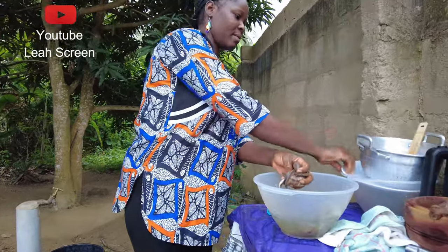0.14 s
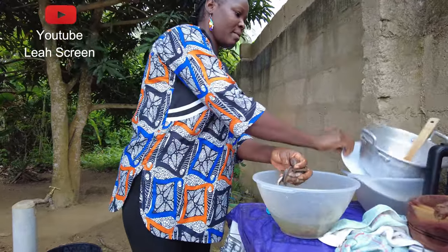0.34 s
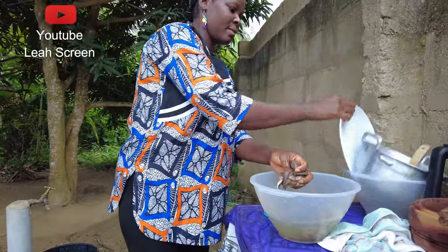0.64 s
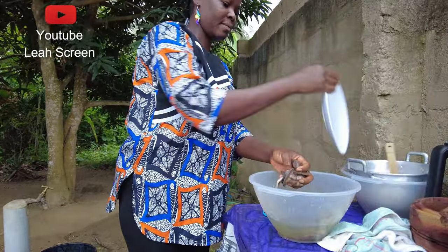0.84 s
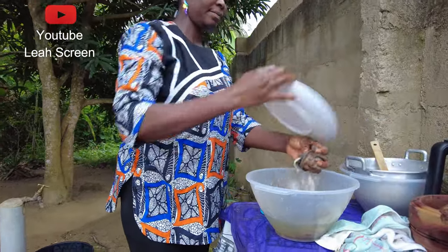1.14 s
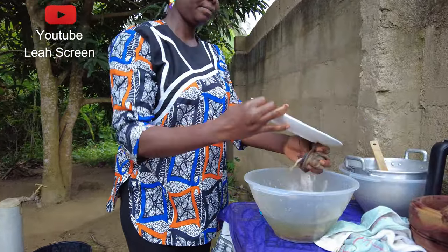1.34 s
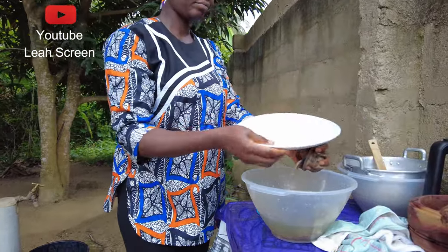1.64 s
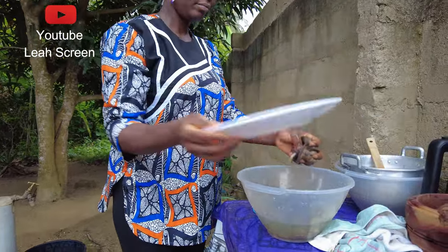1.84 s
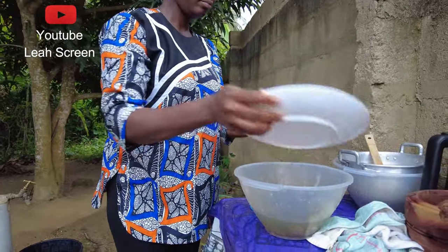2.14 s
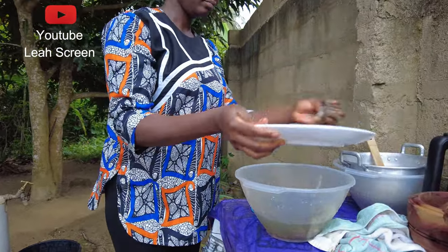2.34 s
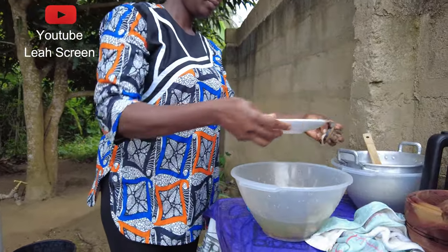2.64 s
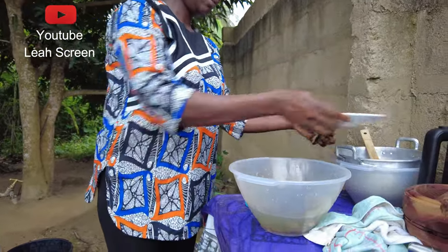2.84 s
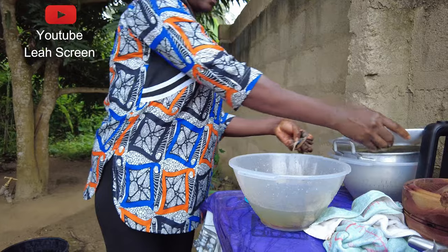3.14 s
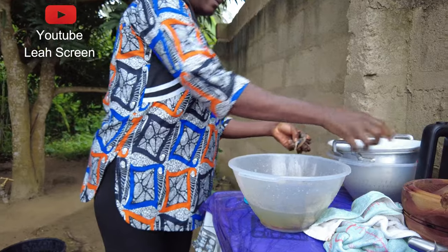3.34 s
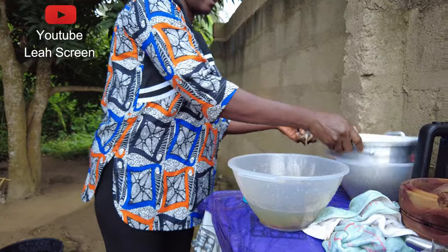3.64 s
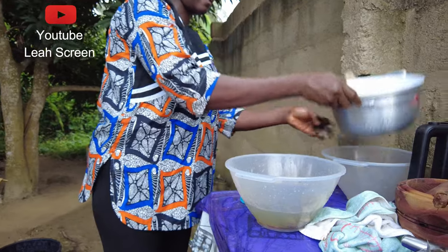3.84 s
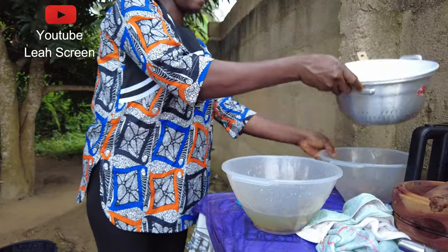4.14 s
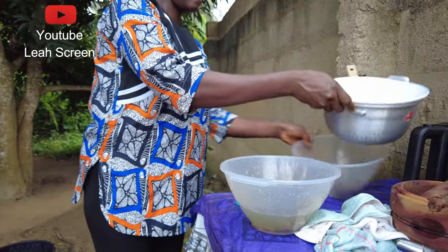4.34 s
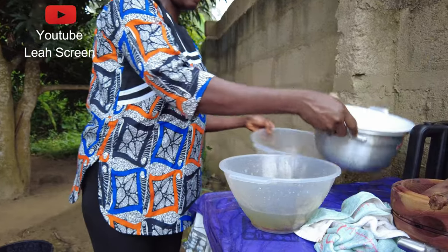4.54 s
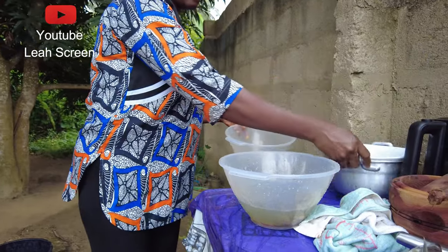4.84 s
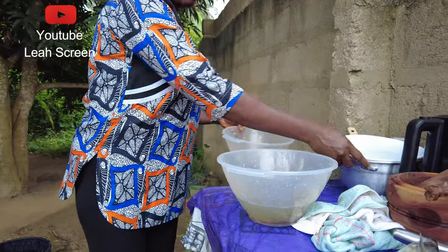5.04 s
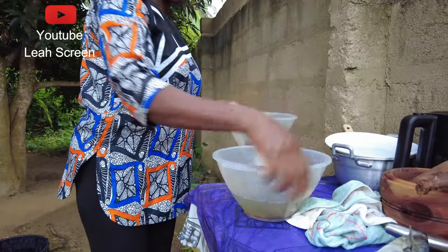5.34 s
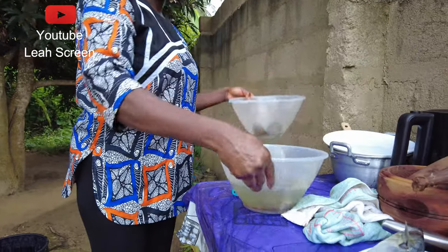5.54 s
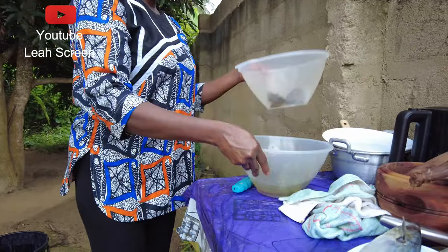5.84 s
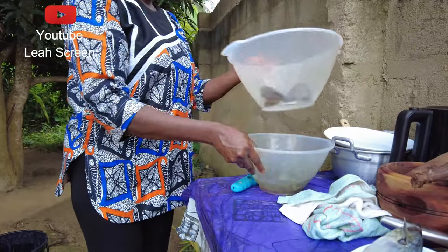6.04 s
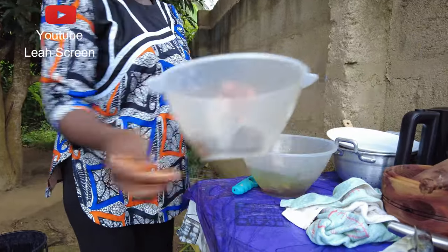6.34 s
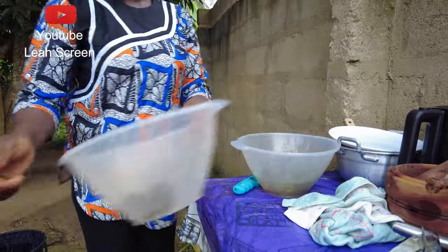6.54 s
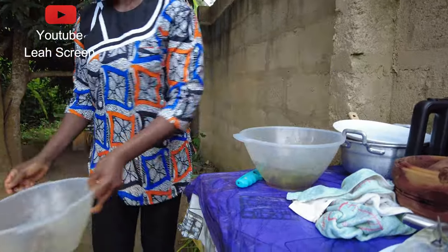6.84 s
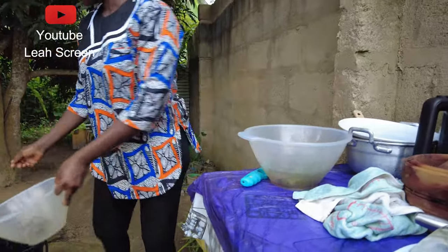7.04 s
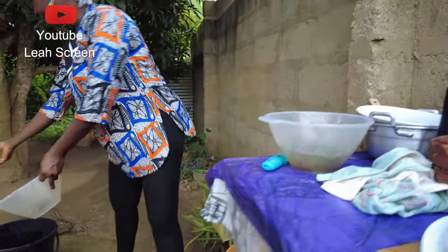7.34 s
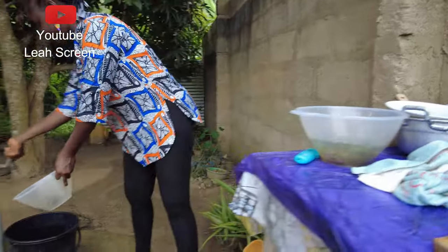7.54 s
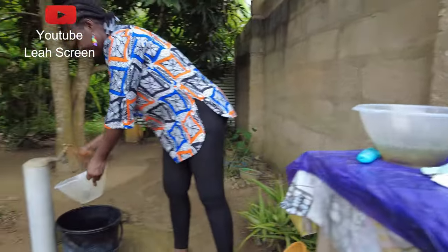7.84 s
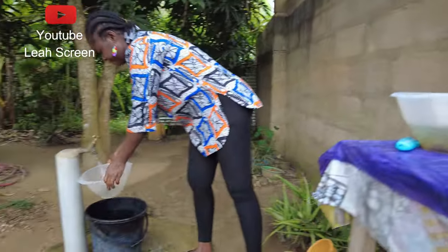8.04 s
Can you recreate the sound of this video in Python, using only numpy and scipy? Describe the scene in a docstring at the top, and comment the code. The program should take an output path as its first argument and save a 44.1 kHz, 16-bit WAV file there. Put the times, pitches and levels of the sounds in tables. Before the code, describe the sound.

Close stereo sound of outdoor kitchen handling: a burst of dry metallic clanks, scraping and dull table thuds comes first, followed by a lull of fabric swishes. A plate is set down with crisp clacks, light plastic taps follow, the pot is put down softly, and plastic bowls knock and slide with shells inside. Fine wet ticks and swelling cloth rustle close it, over low rumble, airy hiss and thin insect chirr.

```python
"""A metal pot, a plate laid on it as a lid and snail shells in plastic bowls knock about in a yard
kitchen: struck bodies sum damped modes and a dense clack, and sliding excites them by random slips.
The covered table thuds as short low pushes; wet shells and drops tick as brief rising notes. Sleeves
and cloth, insects, a low distant rumble and outdoor hiss are shaped random spectra. The table sounds
differ in phase and level between the two channels, and wall and ground echoes follow them."""
import sys
import numpy as np
from scipy import signal
from scipy.fft import rfft, irfft, next_fast_len
from scipy.io import wavfile
from scipy.ndimage import uniform_filter1d

SR = 44100
rng = np.random.default_rng(int(sys.argv[2]) if len(sys.argv) > 2 else 0)


def int16_out(signal):
    """Quantize to a 16-bit WAV file."""
    q = np.round(np.clip(np.atleast_2d(signal).T, -1, 1) * 32767)
    wavfile.write(sys.argv[1], SR, q.astype(np.int16))


N = 361619  # samples

# All levels are set ahead of the soft ceiling; those of table sounds also ahead of the stereo width.
# Blows on each body: [t/s, low level/dB, middle level/dB, bright level/dB, favoured mode f/Hz]
POT_STRIKES = [(0.064, -47, -24.5, -33.5, 1820), (0.147, -27.5, -39, -57.5, 1270),
               (0.28, -39, -35, -46, 1240), (0.414, -21, -17.5, -22, 1780), (0.428, -7.5, -25, -28.5, 1630),
               (0.451, -4.5, -34.5, -24, 1590), (0.498, -7, -20, -29.5, 1260),
               (0.526, -26.5, -23.5, -36.5, 1600), (0.591, -9.5, -21.5, -34, 1250),
               (0.659, -4, -42.5, -37, 1580), (0.681, -7, -6.5, -6, 1826), (0.693, -9.5, -27, -21.5, 1270),
               (0.737, -9.5, -36, -31, 1440), (0.777, -8.5, -30.5, -16.5, 1000),
               (0.785, -9, -20, -6.5, 2010), (0.817, -10, -14.5, -10, 2670), (1.193, -40, -30, -34.5, 1207),
               (4.927, -25.5, -32, -39, 1280), (4.975, -21.5, -14, -26.5, 1524),
               (5.028, -38.5, -21, -25, 950), (5.046, -35, -13, -30, 1516),
               (5.064, -37.5, -18.5, -49, 1550), (5.086, -26, -25, -48, 1480)]
LID_STRIKES = [(2.748, -62.5, -32.5, -27, 3080), (3.044, -10.5, -8, -9.5, 1810),
               (3.116, -23.5, -36, -38, 2680), (3.154, -28.5, -15, -17, 2600),
               (3.256, -25, -20.5, -23, 1570), (3.292, -14.5, -5, -11, 1968), (3.336, -47, -29, -30, 1980),
               (3.489, -40.5, -41.5, -60.5, 1530), (3.557, -46, -45, -64, 1500),
               (3.762, -39.5, -53, -46, 1260)]
BOWL_STRIKES = [(1.534, -44.5, -35, -43.5, 2690), (1.907, -72, -52.5, -36, 1770),
                (3.986, -38, -42, -43.5, 1240), (4.065, -22.5, -21.5, -28.5, 1270),
                (4.195, -32, -29.5, -52.5, 1260), (4.215, -40, -30, -56, 1380),
                (4.253, -33.5, -31.5, -60, 1740), (4.435, -8.5, -12, -17.5, 1670),
                (5.203, -35.5, -34, -56, 1160), (5.447, -26, -26, -31.5, 1440),
                (5.655, -44, -28.5, -51.5, 1500), (5.713, -35, -39, -59.5, 1250),
                (5.825, -21, -16.5, -30, 1370), (5.842, -18, -21, -22.5, 1100),
                (5.916, -16, -18.5, -25.5, 1770), (5.944, -12.5, -11.5, -18.5, 1800),
                (5.977, -21.5, -27, -48.5, 1370), (6.241, -23, -50.5, -46, 1590),
                (6.446, -46, -34.5, -46, 3000), (6.509, -35.5, -28.5, -58.5, 1300),
                (6.579, -46, -39, -27.5, 2210), (6.64, -56, -29.5, -33, 1510),
                (6.666, -33.5, -36, -53, 1490), (6.756, -17.5, -42.5, -49, 1010),
                (6.775, -19.5, -16, -52.5, 1300), (6.799, -32.5, -16, -57, 1000),
                (6.846, -45, -23, -24, 2060), (7.137, -39, -50.5, -54, 1260),
                (7.276, -53, -39, -29.5, 2920), (7.369, -51.5, -39.5, -28.5, 1790),
                (7.487, -52, -51.5, -32.5, 2280)]
# Normal modes of each body: [f/Hz, level/dB, free t60/s]
POT_MODES = [(452.2, -13.5, 0.035), (544, 6.5, 0.068), (667, -11.5, 0.065), (839.5, -9.5, 0.04),
             (1279, -3.5, 0.07), (1550, 3, 0.082), (1683, 0.5, 0.0375), (1796, -10.5, 0.019),
             (2012, 2.5, 0.034), (2513, -14.5, 0.093), (2670, 4, 0.032), (2910, -0.5, 0.061),
             (3500, -15, 0.069), (4080, 2, 0.038), (4300, 4, 0.045), (5940, -12.5, 0.15),
             (6179, -7.5, 0.071), (7640, -7.5, 0.068)]
LID_MODES = [(453, 2, 0.15), (673, -8, 0.058), (1016, -7, 0.088), (1336, -4.5, 0.1), (1550, 7, 0.04),
             (1988, 11, 0.053), (2130, 4, 0.083), (2200, -14.5, 0.079), (2640, 4, 0.087), (2940, -1, 0.1),
             (2965, 5.5, 0.3), (3206, 8.5, 0.03), (3554, 16, 0.033), (3720, -3.5, 0.074), (4660, 3.5, 0.13),
             (4565, 11, 0.0907), (6070, -8, 0.07), (7800, 3.5, 0.056)]
BOWL_MODES = [(429.6, -6, 0.14), (537, 0, 0.0567), (586, 7, 0.017), (670, 3.5, 0.033), (1000, 14.5, 0.151),
              (1270, 8, 0.071), (1600, 8.5, 0.052), (1770, 4.5, 0.13), (2100, 4, 0.13), (2270, -15.5, 0.12),
              (2770, 3, 0.038), (3253, -27, 0.046), (4144, 13, 0.024), (5040, 4.5, 0.0186)]
# Sliding and rattling between blows:
# [peak t/s, body level/dB, rise from 20 dB down/s (sign ignored), fall by 20 dB/s, bright share/dB]
POT_STROKES = [(0.062, -45, -3, 1.2, -7.5), (0.264, -33, 0.1, 0.14, -18.5), (0.425, -25, 0.012, 0.13, -18),
               (0.53, -28.5, 0.3, 0.12, -18.5), (0.66, -20, 0.012, 0.13, -16.5),
               (0.72, -25, 0.2, 0.24, -10.5), (0.81, -26.5, -0.2, 0.16, -19), (0.9, -50, 0.05, 0.2, -22),
               (4.92, -39.5, -0.07, 0.07, -22), (4.98, -27, 0.04, 0.07, -15),
               (5.058, -25, 0.12, 0.07, -18.5)]
LID_STROKES = [(3.055, -27.5, 0.008, 0.115, -39), (3.235, -39, 0.062, 0.097, -15),
               (3.3, -20, 0.0304, 0.073, -13)]
BOWL_STROKES = [(4.076, -48, 0.082, 0.075, -18.5), (4.198, -39, 0.082, 0.094, -26),
                (4.445, -48, 0.008, 0.08, 6), (5.955, -24.5, 0.113, 0.0485, -21),
                (5.84, -42, 0.033, 0.155, 3.5), (6.43, -42.5, 0.0396, 0.54, -23),
                (6.6, -52, 0.13, 0.15, -19.5), (6.772, -20.5, 0.025, 0.071, -40),
                (7.14, -42.5, 0.28, 0.046, -22), (7.3, -60, 0.045, 0.18, -12),
                (7.46, -59.5, 0.15, 0.07, -4), (8.03, -53, 0.13, 0.17, -24)]
# Dull pushes through the table top and bowl bottoms: [t/s, peak level/dB, f/Hz]
TABLE_PUSHES = [(0.129, -27, 234), (0.306, -26, 288), (0.426, -18, 226.7), (0.455, -12.5, 279),
                (0.591, -20.5, 347), (0.657, -14, 267.3), (0.693, -14.5, 166.4), (0.783, -3.5, 226),
                (0.798, -11, 225.4), (0.821, -11.5, 269.5), (3.042, -23, 183), (3.115, -24, 199),
                (3.298, -9, 259.3), (3.333, -17.5, 240), (3.486, -31, 236.4), (3.687, -35.5, 218),
                (3.761, -32.5, 230), (4.066, -18.5, 163.2), (4.094, -20.5, 155), (4.127, -27, 155.8),
                (4.187, -28, 136.7), (4.907, -24, 161), (4.979, -18.5, 276.4), (5.037, -26, 227.7),
                (5.447, -29, 118), (5.873, -5.5, 162), (5.957, -13, 140.7), (5.984, -20, 180),
                (6.244, -27, 152), (6.757, -11, 278), (6.775, -11.5, 265), (6.799, -20.5, 318),
                (7.083, -31, 210)]
# Ticks of wet shells and drops: [t/s, level/dB, starting f/Hz]
SHELL_TICKS = [(5.7763, -39, 1550), (6.4741, -35.5, 3020), (6.548, -34, 1280), (6.5685, -35, 2200),
               (7.276, -39, 2885), (7.3044, -42, 2200), (7.3442, -42, 2100), (7.3731, -32.5, 1759),
               (7.3915, -42, 1740), (7.426, -36, 1653), (7.375, -37, 4600), (7.43, -39, 4600),
               (7.4494, -41, 2640), (7.4855, -41, 2270), (7.5058, -39, 3036), (8.145, -31, 4333)]
# Dense unresolved overtones of a knock: [f/Hz, level/dB per Hz]
CLACK_SPECTRUM = [(150, -3), (350, 3), (664, 4.5), (1060, 2), (1760, -5), (2710, -9.5), (3850, -11),
                  (6330, -18.5), (10000, -28), (16000, -30)]
# Edges between the low, middle and bright parts of a blow: [f/Hz]
BAND_EDGES = [900, 3500]

# Continuous cloth movement: [t/s, treble level/dB, extra level below the treble/dB]
CLOTH_MOVEMENT = [(0.0, -66.5, 10.5), (0.28, -60, 6.5), (0.95, -63, 6), (1.3, -62.5, 4.5), (2.0, -63, 4),
                  (2.3, -61.5, 7.5), (2.6, -61, 4), (2.73, -68, 4), (3.03, -69.5, 13.5), (3.49, -73, 10.5),
                  (3.8, -59, 1.5), (4.27, -63, 5), (4.5, -58, 0), (5.2, -59.5, 5), (5.76, -58, 2.5),
                  (6.0, -58, 2.5), (6.6, -59, 10.5), (7.0, -59, 3.5), (7.2, -59.5, -5), (7.3, -55.5, 5),
                  (7.5, -55.5, 2), (7.6, -58.5, -5), (8.2, -48, -2)]
# Single sleeve swishes: [peak t/s, treble level/dB, rise and fall by 20 dB/s]
SLEEVE_SWISHES = [(1.162, -56, 0.11), (1.37, -59, 0.085), (1.44, -55.5, .04), (1.594, -55, .05),
                  (2.054, -50, 0.045), (2.205, -46.5, 0.119), (2.338, -52.5, 0.046), (2.495, -52.5, .08),
                  (2.575, -52, 0.057), (2.867, -46, 0.124), (4.068, -53.5, 0.14), (4.169, -44.5, 0.047),
                  (4.353, -58.5, .08), (4.702, -55.5, 0.087), (5.228, -51, .03), (5.282, -52, 0.094),
                  (5.453, -49.5, .08), (5.65, -51.5, 0.15), (5.823, -58, 0.044), (6.033, -47.5, 0.095),
                  (6.213, -49, 0.098), (6.42, -52, .05), (6.557, -50.5, .05), (6.65, -52, 0.06),
                  (6.946, -49.5, 0.07), (7.121, -55, 0.092), (7.24, -55, 0.026), (7.749, -50.5, 0.11)]
# Spectrum of rubbed cloth: [f/Hz, level/dB per Hz]
CLOTH_SPECTRUM = [(500, -31.5), (900, -0.5), (1500, 8), (2400, 3.5), (3050, 8), (3800, 1.5), (4600, 3.5),
                  (6000, 1.5), (9300, 2.5), (11600, -1), (13000, 3), (16000, 0.5)]
# Air of the yard, in phase and in opposition in the channels: [f/Hz, level/dB per Hz]
AIR_COMMON = [(88, -50), (150, 3.5), (286, -6.5), (448, -4), (998, -19), (1260, -13), (1870, -20.5),
              (2980, -35), (5050, -32.5), (5790, -18), (7040, -35), (9260, -22), (10200, -37.5),
              (13200, -34), (16000, -47.5)]
AIR_OPPOSED = [(35, -17), (60, 15), (113, 1), (301, -6), (540, 0.5), (785, -2), (1140, -1.5), (1340, -20),
               (2840, -11.5), (5860, -2.5), (7060, -7.5), (9350, -9.5), (10500, -16), (13600, -14.5),
               (16000, -13)]
# Distant rumble: [f/Hz, level/dB per Hz]
RUMBLE_SPECTRUM = [(8.8, -1.5), (15, -16.5), (70, 1.5), (91, 2), (117, -11), (150, -19), (195, -17.5),
                   (225, -18), (260, -26.5), (340, -43), (570, -120)]
# Insect chirr, its higher band louder near the end:
# [centre f/Hz, width/Hz, relative level/dB, late level change/dB]
CHIRR_BANDS = [(5900, 450, 0, 0), (9100, 450, -1, 7)]

# Phase difference between the channels: [f/Hz, phase/rad (negative is a lag of the far channel)]
CHANNEL_PHASE = [(0, 0), (100, -.3), (250, -.8), (500, -1.75), (860, -2.3), (1030, -3.3), (1140, -3.6),
                 (1260, -6.7), (2600, -6.7), (4000, -8.8), (5000, -8.5), (6000, -6.6), (7000, -8.7),
                 (9000, -7.3), (16000, -8.4)]
# Level difference between the channels: [f/Hz, far minus near level/dB]
CHANNEL_LEVEL = [(2300, 0), (2930, 1.5), (3900, 0.5), (5200, -6), (6500, -2), (9000, -4), (12000, 0)]
# Decay of wall and ground echoes: [f/Hz, t60/s]
YARD_DECAY = [(200, 0.32), (1000, 0.178), (4000, 0.1835), (12000, 0.2)]

AIR_COMMON_DB, AIR_OPPOSED_DB, RUMBLE_DB, INSECTS_DB = -53.5, -54.5, -41, -63.5  # RMS
SWISH_LOWER_DB = -1.5  # a swish is thinner below the treble
ECHO_DB = -9.5
THUD_T60_S, THUD_T60_S_PER_DB = 0.017, 0.001  # the hardest pushes are pressed down and die soonest
CROSS_S = 6.2  # the bowl is carried from right to left: near and far channel change places
LATE_S = 7.25  # the higher insect band grows louder from here
EDGE_HZ = 15740  # upper band limit


def amp(db):
    """A level in decibels is twenty times the logarithm of the amplitude ratio."""
    return 10 ** (np.asarray(db) / 20)


def evened(x):
    """Dividing by the root mean square brings a signal to unit effective value."""
    return x / np.sqrt(np.mean(x ** 2) + 1e-20)


def read(points, hz):
    """A spectrum is interpolated along logarithmic frequency."""
    f, value = np.transpose(points)
    return np.interp(np.log(hz + 1), np.log(f + 1), value)


def add(mix, s, sound):
    """Superposition: a sound is summed into the mix from time s."""
    part = mix[max(round(s * SR), 0):][:len(sound)]
    part += sound[:len(part)]


def noise(shape_db, patchy_db, size):
    """Gaussian short-time spectra follow the level shape_db(hz, t), roughened by drifting patches."""
    frames = 4 * N // size + 5
    hz = np.fft.rfftfreq(size, 1 / SR)[:, None]
    t = np.arange(frames) * size / 4 / SR
    real, imaginary, patches = rng.standard_normal((frames, len(hz), 3)).T
    patches = uniform_filter1d(patches, size=8, axis=0)  # across frequency
    patches = evened(uniform_filter1d(patches, size=10, axis=1))  # across time
    spectra = (real + 1j * imaginary) * amp(shape_db(hz, t) + patchy_db * patches)
    return signal.istft(spectra, nperseg=size, noverlap=3 * size // 4)[1][:N]


def yard_air():
    """Coherence: lumpy rumble is alike in both channels; faint hiss has common and opposed parts."""
    rumble = evened(noise(lambda hz, t: read(RUMBLE_SPECTRUM, hz), 1.22, size=2048))
    hiss = evened(noise(lambda hz, t: read(AIR_COMMON, hz), 4.6, size=1024))
    common = amp(AIR_COMMON_DB) * hiss + amp(RUMBLE_DB) * rumble
    opposed = evened(noise(lambda hz, t: read(AIR_OPPOSED, hz), 1.7, size=1024))
    opposed *= amp(AIR_OPPOSED_DB)
    return np.array([common + opposed, common - opposed])


def insects():
    """Narrow-band noise: resonance-shaped bands of hiss, incoherent between the channels."""
    centre_hz, width_hz, db, late_db = np.transpose(CHIRR_BANDS)[:, :, None, None]

    def shape_db(hz, t):
        late = np.clip((t - LATE_S) / 0.15, 0, 1)
        level = amp(db + late_db * late)
        resonance = 1 / (1 + (2 * (hz - centre_hz) / width_hz) ** 2)
        return 20 * np.log10((level / np.sqrt(width_hz) * resonance).sum(0))

    return amp(INSECTS_DB) * np.array([evened(noise(shape_db, 1.8, size=1024)) for _ in "LR"])


def rustle(alike, apart):
    """Friction noise: cloth hiss swells with movement and swishes, partly alike in the channels."""
    s, bed_db, lower_db = np.transpose(CLOTH_MOVEMENT)
    at, peak_db, length = np.transpose(SLEEVE_SWISHES)[:, :, None]

    def shape_db(hz, t):
        below = np.clip(np.log2(10000 / (hz + 50)), 0, 1)  # 0 in the treble, 1 from an octave below
        swish = (amp(peak_db - 20 * abs(t - at) / length) ** 2).sum(0)
        swish = swish * amp(SWISH_LOWER_DB * below) ** 2
        bed = amp(np.interp(t, s, bed_db) + np.interp(t, s, lower_db) * below) ** 2
        return read(CLOTH_SPECTRUM, hz) + 10 * np.log10(bed + swish)  # powers add

    # takes the loudness of the cloth spectrum itself out of the levels
    cloth = amp(read(CLOTH_SPECTRUM, np.fft.rfftfreq(256, 1 / SR)))
    steady = np.linalg.norm(cloth) * np.sqrt(2 / 3)
    shared, left, right = (noise(shape_db, 2.2, size=256) / steady for _ in range(3))
    return alike * shared + apart * np.array([left, right])


def clack(white):
    """High modal density: noise coloured like a knock, in overlapping low, middle and bright parts."""
    hz = np.fft.rfftfreq(len(white), 1 / SR)
    below = 1 / (1 + (hz / np.array(BAND_EDGES)[:, None]) ** 6)
    powers = np.abs([below[0], below[1] - below[0], 1 - below[1]])
    spectra = rfft(white) * amp(read(CLACK_SPECTRUM, hz)) * np.sqrt(powers)
    parts = irfft(spectra, len(white))
    return parts / parts.std(1)[:, None]


def rings(modes, grip_db, free_db, phase=0):
    """Damping: contact kills each mode fast (grip_db a second at 2 kHz), leaving a faint free ring."""
    t = np.arange(SR // 5) / SR
    hz, db, t60 = np.transpose(modes)[:, :, None]
    gripped = amp(-abs(grip_db) * t * (hz / 2000) ** 0.44)  # faster up high
    fade = amp(-60 * t / t60) * (gripped + amp(free_db))
    ring = amp(db) * fade * np.sin(2 * np.pi * (hz * t + phase))
    group = np.searchsorted(BAND_EDGES, hz[:, 0])  # 0 low, 1 middle, 2 bright
    return ring, group


def drag(strokes, modes, per_s, grain_db, grip_db, dense_db):
    """Stick-slip: dense uneven slips (per_s a second) shake a held body; strokes swell and fade."""
    out = np.zeros(N)
    t = np.arange(-SR // 5, 2 * SR // 5) / SR  # about the stroke's peak
    ring, group = rings(modes, grip_db, free_db=-31)
    ring = ring * (np.transpose(modes)[0][:, None] / 1500) ** -.7  # soft slips shake high modes less
    for s, db, rise_s, fall_s, bright_db in strokes:
        luck = rng.random((len(t), 3))
        slip_size = amp(-grain_db * np.log(luck[:, 1] + 0.074))
        slips = (luck[:, 0] < per_s / SR) * slip_size * np.sign(luck[:, 2] - .5)
        low, middle, bright = clack(slips)
        ringing = signal.fftconvolve(slips, ring[group < 2].sum(0))[:len(t)]
        body = evened(ringing) + amp(dense_db) * (1.25 * low + middle)
        sound = evened(body) + amp(bright_db) * bright
        stroke_db = db - 20 * np.maximum(-t / abs(rise_s), t / abs(fall_s)) ** 1.147
        sound = sound * amp(stroke_db) * signal.windows.tukey(len(t), .5)
        start = max(round(-(s + t[0]) * SR), 0)  # skips what would fall before time zero
        add(out, s + t[start], sound[start:])
    return out


def blows(table, modes, clack_db, clack_s, tail_db, tail_s, grip_db, free_db, touch_s):
    """Impact: the ring builds up during contact; its place decides which modes top the dense clack."""
    out = np.zeros(N)
    t = np.arange(SR // 5) / SR
    hz = np.transpose(modes)[0]
    luck = rng.standard_normal((len(table), len(t) + 2 * len(modes)))
    clack_fade = np.exp(-t / (clack_s + touch_s)) + amp(tail_db) * np.exp(-t / tail_s)
    clack_fade = (1 - np.exp(-t / 0.00013)) * clack_fade  # very short onset
    for (s, *levels_db, favoured_hz), draw in zip(table, luck):
        ring, group = rings(modes, grip_db, free_db, phase=draw[-len(hz):, None])
        ring = ring * (1 - np.exp(-(t / touch_s) ** 2))
        favour_db = 13.4 * np.exp(-(np.log(hz / favoured_hz) / 0.074) ** 2)
        place = amp(2.3 * draw[len(t):-len(hz)] + favour_db)
        for k, (db, dense) in enumerate(zip(levels_db, clack(draw[:len(t)]))):
            part = place[group == k] @ ring[group == k]
            part = part / abs(part).max() + amp(clack_db[k]) * dense * clack_fade
            add(out, s, amp(db) * part / abs(part).max())
    return out


def pot():
    """Modal vibration of a metal pot, excited by sliding and by blows."""
    struck = blows(POT_STRIKES, POT_MODES, [-16, -8, -3], clack_s=0.004, tail_db=-7.0, tail_s=0.0231,
                   grip_db=801.5, free_db=-36, touch_s=0.0024)
    return struck + drag(POT_STROKES, POT_MODES, per_s=900, grain_db=4.5, grip_db=500, dense_db=-4)


def thuds():
    """Heavy damping: a low push swells for about one cycle, then dies."""
    out = np.zeros(N)
    t = np.arange(SR // 4) / SR
    for s, db, hz in TABLE_PUSHES:
        t60 = THUD_T60_S - THUD_T60_S_PER_DB * db
        rise_s = 1.11 / hz + 0.00076
        swell = np.sin(np.pi / 2 * np.minimum(t / rise_s, 1)) ** 2
        fade = amp(-60 * np.maximum(t - rise_s, 0) / t60)
        push = swell * fade * np.sin(2 * np.pi * hz * t)
        add(out, s, amp(db) * push / abs(push).max())
    return out


def bowl():
    """Modal vibration of plastic bowls, excited by knocking and sliding."""
    struck = blows(BOWL_STRIKES, BOWL_MODES, [-14, -10, -3], clack_s=0.0025, tail_db=-16.5, tail_s=0.054,
                   grip_db=795.5, free_db=-30.5, touch_s=0.0016)
    return struck + drag(BOWL_STROKES, BOWL_MODES, per_s=450, grain_db=5, grip_db=600, dense_db=-5)


def lid():
    """Modal vibration of the plate laid on the pot, excited by blows and sliding."""
    struck = blows(LID_STRIKES, LID_MODES, [-16, -12, -5], clack_s=0.0051, tail_db=-14.5, tail_s=0.0292,
                   grip_db=902.5, free_db=-21.5, touch_s=0.0021)
    return struck + drag(LID_STROKES, LID_MODES, per_s=1100, grain_db=1.5, grip_db=600, dense_db=-3)


def pips():
    """Frequency glide: short notes whose phase grows quadratically, so the pitch rises a little."""
    out = np.zeros(N)
    t = np.arange(1500) / SR
    envelope = t / 0.00332 * np.exp(1 - t / 0.00222)
    for s, db, hz in SHELL_TICKS:
        add(out, s, amp(db) * envelope * np.sin(2 * np.pi * hz * t * (1 + 2.2 * t)))
    return out


def stereo_width(x):
    """Stereo width: the two channels differ in phase and level by frequency."""
    size = next_fast_len(N)
    hz = np.fft.rfftfreq(size, 1 / SR)
    # half of the difference goes to each channel
    half = np.exp(1j * read(CHANNEL_PHASE, hz) / 2) * amp(read(CHANNEL_LEVEL, hz) / 2)
    far_near = irfft(rfft(x, size) * np.array([half, 1 / half]), size)[:, :N]
    return np.where(np.arange(N) < CROSS_S * SR, far_near, far_near[::-1])


def echoes(x):
    """Reverberation: sparse random-sign taps, each band with its own decay, more alike in the bass."""
    taps = np.zeros((2, SR // 2))
    slots = np.arange(150, SR // 2 - 20, 20)  # one tap in every 20 samples
    at = slots + rng.integers(0, 20, (2, (SR // 2 - 151) // 20))
    np.put_along_axis(taps, at, rng.choice([-1., 1.], at.shape), 1)
    hz, t, (common, opposed) = signal.stft(taps, SR, nperseg=512)
    opposed = opposed * (hz / (hz + 250))[:, None]
    decay = amp(-60 * t / read(YARD_DECAY, hz)[:, None])
    spectra = np.array([common + opposed, common - opposed]) * decay
    tail = signal.istft(spectra, SR, nperseg=512)[1]
    return signal.fftconvolve(x[None], tail / np.linalg.norm(tail[0]), axes=1)[:, :N]


def scene():
    """Superposition of the table sounds, direct and echoed, with cloth, insects and yard air."""
    table = pot() + thuds() + bowl() + lid() + pips()
    heard = stereo_width(table) + amp(ECHO_DB) * echoes(table)
    return heard + rustle(alike=1.0, apart=1.46) + insects() + yard_air()


def record(dry):
    """Saturation: a soft ceiling bends the loudest blows, then a low-pass limits the band."""
    held = 1.475 * np.tanh(dry / 1.178)
    low_pass = signal.firwin(1535, EDGE_HZ, window=("kaiser", 9), fs=SR)
    return signal.oaconvolve(held, low_pass[None], "same")


dry = scene()
out = record(dry)
int16_out(out)
```